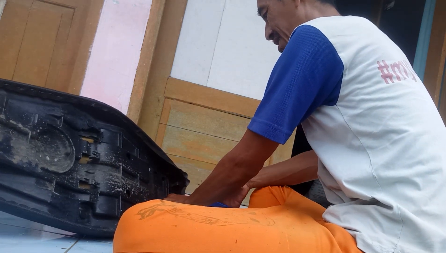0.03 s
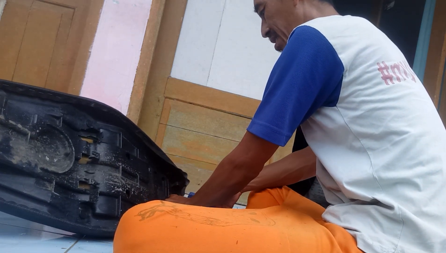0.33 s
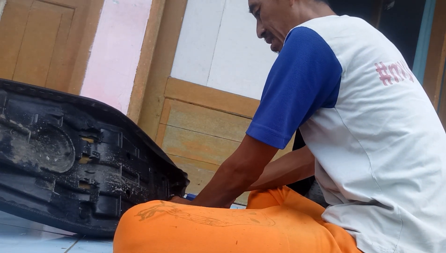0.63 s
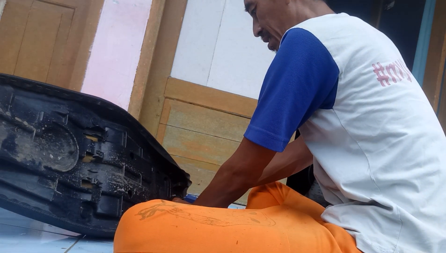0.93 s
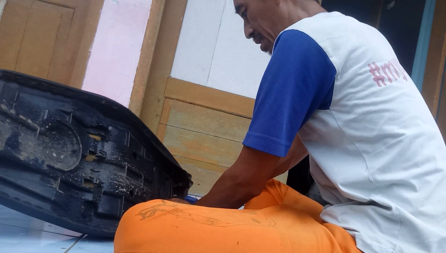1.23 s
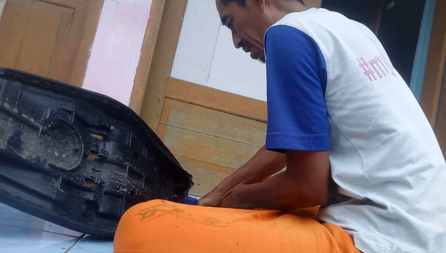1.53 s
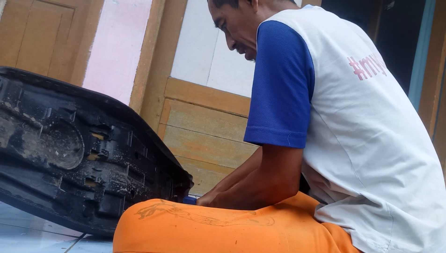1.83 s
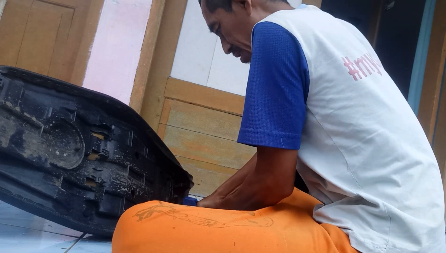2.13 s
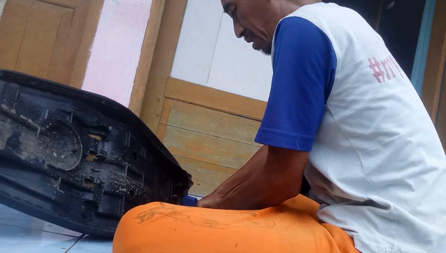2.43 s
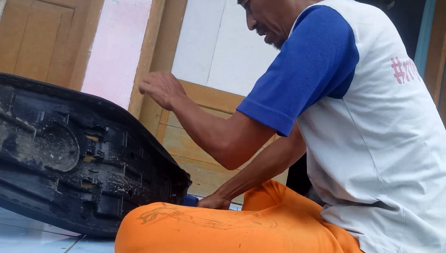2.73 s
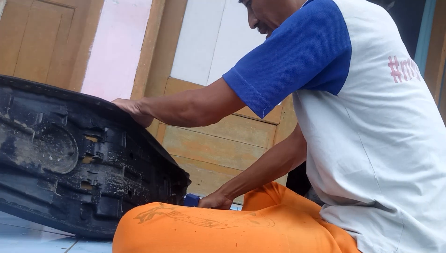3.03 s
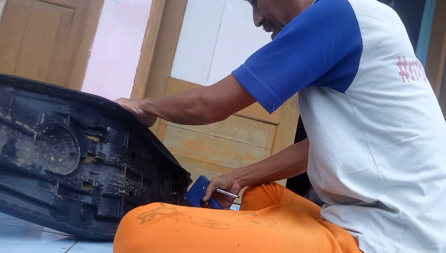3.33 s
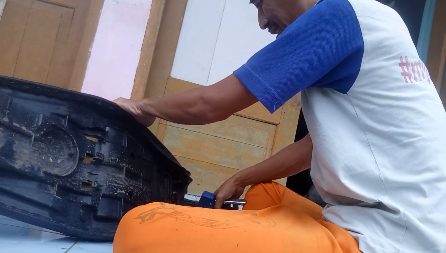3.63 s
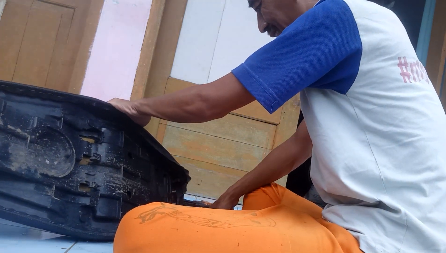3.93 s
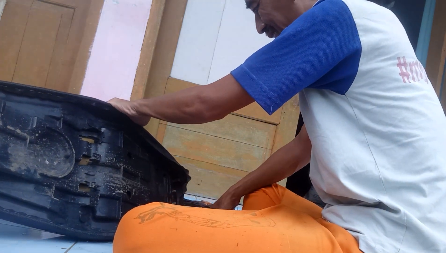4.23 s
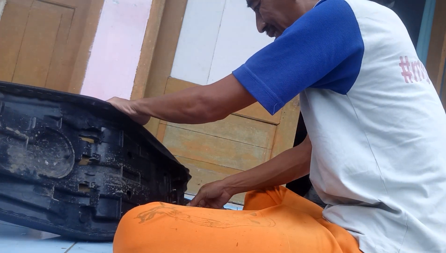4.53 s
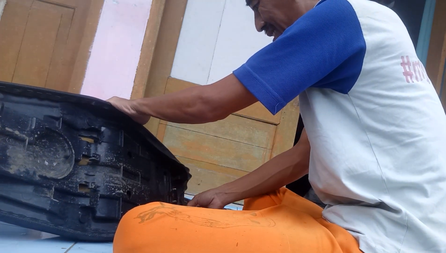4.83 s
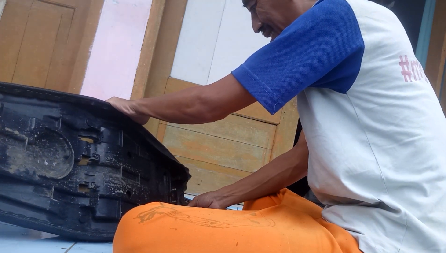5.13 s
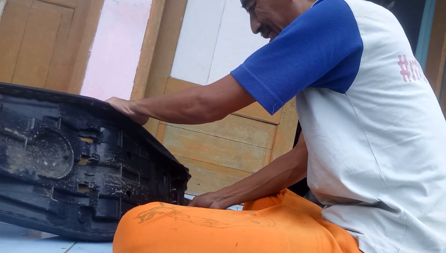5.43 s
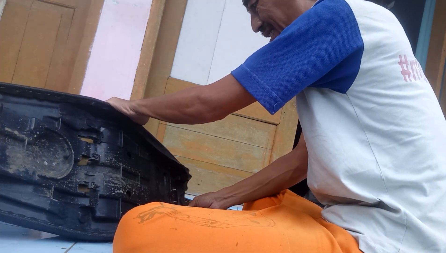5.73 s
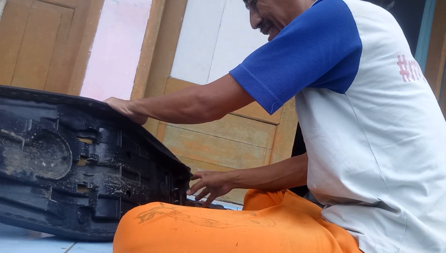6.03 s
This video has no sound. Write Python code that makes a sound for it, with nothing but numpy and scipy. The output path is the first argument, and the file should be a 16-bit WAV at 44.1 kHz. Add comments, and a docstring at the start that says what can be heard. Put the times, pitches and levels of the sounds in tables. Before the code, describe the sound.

Close up on a tiled porch, a hand staple gun is worked against a plastic motorbike seat. After a microphone pop on the left, it clicks twice, then fires with one loud, ringing snap. A palm pats the padding, metal parts slide and tick, and two more sharp clacks follow. Each hit echoes briefly off the walls, while small birds chirp faintly over a low, distant rumble.

```python
"""A tiled porch, stereo microphones close to a plastic motorbike seat.
A hand staple gun is fired, released and handled against the seat, and a palm pats the padding.
Each clack is a quick cluster of metal contacts that ring in the gun and seat pan and echo off the walls.
Small birds chirp outside over a low, distant rumble; one pop hits the left microphone."""
import sys
import numpy as np
from scipy import signal
from scipy.io import wavfile
from scipy.ndimage import uniform_filter1d

SR = 44100
rng = np.random.default_rng(int(sys.argv[2]) if len(sys.argv) > 2 else 0)


def pcm_store(signal):
    """Save signal as 16-bit PCM."""
    levels = np.round(np.clip(np.atleast_2d(signal), -1, 1) * 32767)
    wavfile.write(sys.argv[1], SR, levels.astype(np.int16).T)


N = 267687
TIME = np.arange(N) / SR
EDGES = 22 * 2 ** np.arange(0, 9.7, 1 / 3)   # third-octave bands [Hz]
CENTRES = np.sqrt(EDGES[1:] * EDGES[:-1])
BANK = [signal.butter(2, band, "band", fs=SR, output="sos") for band in zip(EDGES, EDGES[1:])]
# how much louder the left microphone hears: (frequency [Hz], left over right [dB])
MIC_BALANCE = [(40, 14), (130, 4.1), (300, 5.1), (700, 6.5), (1400, 6.5), (4400, 0.5), (9000, 0.5)]


def staple_gun(rise_s=0.0014, crack_db=-6, sharp_t60=0.019, clink_room_db=-12):
    """Close up, each contact is a crack and a burst of crowded metal modes; returns (direct, to walls)."""
    direct, to_room, t = slides(), np.zeros((2, N)), TIME[:SR // 12]
    top_bands = np.clip((CENTRES - 5500) / 2500, 0, 1)
    for s, db, (bass_db, middle_db, treble_db), pan_db, t60, room_db in contacts():
        hardness_db = min(db + 24, 0) - treble_db - 5.5   # harder contacts have more at the very top
        colour = contact_colour(bass_db, middle_db, treble_db) + top_bands * hardness_db
        ring = rms_one(coloured_noise(colour, attack(t, rise_s) * decay(t, t60)))
        sharpness = min(sharp_t60 / t60, 1) ** 2   # short contacts crack most
        burst = ring + from_db(crack_db) * sharpness * crack(colour, t)
        burst = from_db(db) * rms_one(burst * panned(pan_db)) * np.sqrt(.01 / t[-1])   # level over 10 ms
        add(direct, s, burst)
        add(to_room, s, from_db(room_db) * burst)
    steel = clinks()
    return gun_body(direct) + steel, gun_body(to_room) + from_db(clink_room_db) * steel


def contacts(bounces=3, bounce_t60=.048, catch_ring_ratio=1.3):
    """The sprung mechanism snaps: a catch lets go, the blow lands, parts bounce evenly. Handling ticks."""
    # snaps: (time [s], level [dB], bass [dB], middle [dB], treble [dB], pan left [dB], t60 [s], room [dB],
    # catch lead [s], catch [dB], bounce gap [s], first bounce [dB], loss per bounce [dB])
    clacks = [(1.2853, -27, -7.5, 1, -5.5, -1.5, 0.0226, -12.5, 0.000735, -17, .0162, -13.5, 9.5),
              (1.3757, -30, -3.5, 3, 4, -1, .045, -10, .0057, 3.5, .0166, -3, 3.5),
              (2.0362, -15.5, -4, 2, -4.5, -0.5, 0.016, -2.5, .0014, -8, 0.0185, -24.5, 10),
              (4.2552, -17, -30, -1, -1.5, -1, .038, -10, .0102, -1, .0137, -6.5, 13.5),
              (4.3515, -17.5, -12.5, -4, -2.5, -1.5, 0.0447, -10.5, 0.003307, -6, 0.01668, -7.5, 1.46)]
    # tone of a catch and of a bounce against their blow: (bass [dB], middle [dB], treble [dB])
    catch_colour = [-4, 2.5, -5.5]
    bounce_colour = [3.5, -1, -1]
    # light knocks: (time [s], level [dB], middle [dB], treble [dB], t60 [s], pan left [dB], room [dB])
    ticks = [(1.727, -52, -17, -7, 0.098, -3, -9.5), (2.269, -48, -11, -18.5, .047, -1.5, 2),
             (3.028, -58, 12.5, 5.5, 0.089, -3, 1.5), (3.099, -54, -1.5, -10, 0.079, -4.5, -9.5),
             (3.135, -48.5, -16.5, -1, 0.0256, -3, -5.5), (3.248, -44, -2.5, -4.5, 0.047, -5.5, -2.5),
             (3.298, -42.5, -8, -9, 0.186, -1, -19), (3.312, -44.5, -8, -3.5, 0.037, -1, -16.5),
             (3.977, -34.5, -7.5, -11.5, 0.0191, -3, -5), (4.029, -31, -11.5, -11, 0.047, -0.5, -13.5),
             (4.432, -31.5, -2, -9, 0.188, -2, -11.5), (5.987, -54, 15.5, -1, 0.122, -13.5, -7),
             (6.006, -47.5, 22, 0, 0.066, -8.5, 0), (6.025, -45, 26.5, -5, 0.069, -3, 0.5)]
    for s, db, *colour, pan_db, t60, room_db, lead_s, catch_db, gap_s, bounce_db, loss_db in clacks:
        colour = np.array(colour)
        yield s - lead_s, db + catch_db, colour + catch_colour, pan_db, catch_ring_ratio * t60, room_db
        yield s, db, colour, pan_db, t60, room_db
        for k in range(bounces):
            level_db = db + bounce_db - k * loss_db
            yield s + (k + 1) * gap_s, level_db, colour + bounce_colour, pan_db, bounce_t60, room_db
    for s, db, middle_db, treble_db, t60, pan_db, room_db in ticks:
        yield s, db, (middle_db - 12, middle_db, treble_db), pan_db, t60, room_db


def contact_colour(bass_db, middle_db, treble_db):
    """Band levels of one metal contact, in dB."""
    # a plain contact: (frequency [Hz], density [dB])
    spectrum = [(110, -24), (170, -15.5), (240, -0.5), (600, -2), (1200, -2.5), (1600, -3.5), (2200, -3.5),
                (3000, 1), (4600, 3.5), (5800, -8), (6600, -16), (7700, -29.5), (10000, -26.5),
                (15000, -26.5)]
    # where the tone is set: (bass [Hz], middle [Hz], reference [Hz], treble [Hz])
    colour_hz = [330, 1000, 3000, 4800]
    tone_db = np.interp(np.log(CENTRES), np.log(colour_hz), [bass_db, middle_db, 0, treble_db])
    return at_hz(spectrum, CENTRES) + tone_db


def crack(band_db, t, left_lag_s=0.00014):
    """The first impact: one coloured pulse that reaches the left microphone slightly later."""
    pulse = signal.unit_impulse(SR // 100)
    wave = sum((-1) ** k * from_db(db) * signal.sosfilt(BANK[k], pulse)
               for k, db in enumerate(band_db) if CENTRES[k] > 400)
    return rms_one(np.array([np.interp(t - lag, t[:len(wave)], wave, right=0) for lag in (left_lag_s, 0)]))


def gun_body(x, magazine_opens_s=3.2):
    """The gun rings on after each contact, with other modes once its magazine is open."""
    # the closed gun pressed on the seat pan: (frequency [Hz], width [Hz], level [dB])
    closed_modes = [(283, 46, -3.5), (335, 40, -2), (445, 18, 0.5), (619, 60, -3), (774, 17, 1),
                    (805, 8.3, -5), (1054, 110, -2.5), (1157, 20, 1), (1852, 120, -7.5), (2632, 79, -3.5),
                    (2832, 32, -1), (3107, 38, 1), (3366, 29, -2.5), (3893, 93, -6), (4423, 27, 3),
                    (5700, 82, -5.5)]
    # the gun with its magazine slid open: (frequency [Hz], width [Hz], level [dB])
    open_modes = [(452.1, 23, -9), (610.1, 31, 5), (777.3, 12, -4.5), (1089.7, 29, 0.5), (1189.4, 140, 1),
                  (1408, 37, 5.5), (1513, 15, 3), (1972, 57, 0.5), (2240, 64, -5.5), (2465.2, 35, 1),
                  (2700, 35, 0.5), (2870, 15, -8.5), (3370, 560, -7), (4221.4, 52, 1.5), (4471, 65, -2),
                  (5270, 40, -11.5)]
    closed = TIME < magazine_opens_s
    return (ring_modes(x * closed, closed_modes, direct_db=-2.5, modes_db=0)
            + ring_modes(x * ~closed, open_modes, direct_db=-6.5, modes_db=-1))


def staple_shot(s=2.0366, rise_s=0.00083, lag_spread_s=0.00017):
    """The hammer drives the staple home; each mode reaches the two microphones a little apart."""
    # the seat pan knocks and the mainspring rings on: (frequency [Hz], level [dB], t60 [s])
    modes = [(245, -22, 0.021), (293, -21, .04), (345, -21, .05), (455, -35.5, 0.11), (791.3, -35.5, 0.14),
             (1095, -53.5, 0.74), (1204, -23.5, 0.036), (2864, -45, .5), (3060, -46.5, .5),
             (3152.6, -44.5, 0.62), (3230, -47.5, 0.96), (3207, -48, 0.72), (3320, -46, .55),
             (3495, -48.5, .7), (4054, -47.5, .4), (4600, -47.5, .4)]
    out, t = np.zeros((2, N)), TIME[:SR]
    for hz, db, t60 in modes:
        lag_s = lag_spread_s * rng.uniform(-1.4, 1, (2, 1))
        ring = np.sin(2 * np.pi * hz * (t + lag_s)) * attack(t, rise_s) * decay(t, t60)
        add(out, s, from_db(db) * ring * panned(at_hz(MIC_BALANCE, hz)))
    return butter_cut(out, "high", hz=190, order=4)


def clinks(rise_s=0.00025):
    """Thin steel parts touch, striking their modes with new strengths each time and at each microphone."""
    # touches: (time [s], level [dB], t60 [s], tilt [dB per octave])
    touches = [(1.3846, -19.5, 0.0414, 8.5), (1.727, -48.5, 0.0406, -27.5), (1.738, -48.5, 0.0463, -28),
               (3.112, -50.5, 0.097, -11), (3.25, -41, 0.064, -4), (3.267, -41.5, 0.063, -6.5)]
    # steel modes: (frequency [Hz], level [dB])
    modes = [(2950, -14.5), (3120, -12.5), (4330, -4.5), (4480, 1), (4600, -3.5), (4950, -8), (5600, -16.5),
             (6200, -13)]
    out, t = np.zeros((2, N)), TIME[:SR // 5]
    hz, mode_db = np.transpose(modes)[:, :, None, None]
    for s, db, t60, tilt_db in touches:
        phase, weakening = rng.random((2, len(modes), 2, 1))
        strength = from_db(mode_db + tilt_db * np.log2(hz / hz.mean()) - 3.1 * weakening)
        ring = np.sum(strength * np.sin(2 * np.pi * (hz * t + phase)), axis=0)
        add(out, s, from_db(db) * ring * attack(t, rise_s) * decay(t, t60) * panned(db=-4))
    return out


def slides():
    """Friction swells and fades as the magazine and the hand slide."""
    # strokes: (time [s], length [s], level [dB], middle [dB], treble [dB])
    strokes = [(3, 0.107, -61.5, 5.5, 3.5), (3.199, .14, -55.5, -9, 3), (3.953, 0.078, -55.5, -1.5, 1.5),
               (4.222, .036, -49.5, 5, -1), (5.961, 0.1257, -57, 17, -1.5)]
    # soft friction lacks the top of a blow: (frequency [Hz], gain [dB])
    softening = [(5000, 0.5), (8000, -20.5)]
    out = np.zeros((2, N))
    for s, length, db, middle_db, treble_db in strokes:
        colour = contact_colour(-1, middle_db, treble_db) + at_hz(softening, CENTRES)
        add(out, s, from_db(db) * rms_one(coloured_noise(colour, np.hanning(int(length * SR)))))
    return out


def seat_pats(press_s=0.00533):
    """A soft palm sets the low modes of the seat going; the seat is too small to radiate deep bass."""
    # the hand lands: (time [s], level [dB])
    pats = [(2.999, -45), (3.027, -30.5), (3.048, -31.5), (3.100, -51)]
    # the padded seat: (frequency [Hz], level [dB], t60 [s])
    modes = [(90.86, -9.5, 0.141), (152.6, -2.5, 0.099), (174.46, 3, 0.1027), (214.94, -0.5, 0.3),
             (333.4, -19, 0.28)]
    out, t = np.zeros((2, N)), TIME[:SR // 2]
    thud = sum(from_db(db) * np.sin(2 * np.pi * hz * t) * decay(t, t60) for hz, db, t60 in modes)
    for s, db in pats:
        add(out, s, from_db(db) * thud * attack(t, press_s) * panned(db=5.5))
    return butter_cut(out, "high", hz=90)


def spring(width_hz=34, third_db=-14):
    """The spring sings faintly as the lever moves: an uneven tone with its third partial."""
    # lever moves: (time [s], length [s], pitch [Hz], level [dB])
    moves = [(1.405, 0.1535, 594.1, -57), (1.502, 0.1402, 609.3, -59.5), (3.05, .11, 591.9, -61.5),
             (3.187, 0.16, 610.3, -60.5)]
    out = np.zeros((2, N))
    for s, length, hz, db in moves:
        swell = np.hanning(int(length * SR))
        friction = rng.standard_normal(SR)
        partials = [resonance(resonance(friction, k * hz, width_hz), k * hz, width_hz) for k in (1, 3)]
        first, third = (rms_one(partial[-len(swell):]) for partial in partials)
        add(out, s, from_db(db) * swell * (first + from_db(third_db) * third) * panned(db=3))
    return out


def microphone_pop(s=1.1071):
    """A sudden pressure step on the left microphone swings back through its bass cut."""
    step = from_db(-7) * (TIME >= s)
    swing = butter_cut(step, "high", hz=88, order=3)
    return butter_cut(swing, "low", hz=2600) * [[1], [0]]


def near_bird(fall_s=.076, arch_s=.066, fall_swell=1.444, arch_swell=1.144):
    """The nearest bird whistles two calls, one falling and one arched."""
    # the path of each call, evenly spaced in time: (pitch [Hz])
    fall_hz = [5950, 5474, 4640, 4267, 3617]
    arch_hz = [3996, 4266.4, 4500, 4143, 3500]
    # when each is sung: (time [s], level [dB], pitch [ratio])
    falls = [(2.843, -70.5, 0.972), (3.545, -62.5, 0.985), (4.089, -56, 1.0), (4.783, -52.5, 0.9943),
             (5.417, -57, 1)]
    arches = [(3.861, -55.5, 1.005), (5.127, -56.5, 1.0), (5.796, -55.5, 1.0)]
    out = np.zeros((2, N))
    for calls, length, path_hz, swell in ((falls, fall_s, fall_hz, fall_swell),
                                          (arches, arch_s, arch_hz, arch_swell)):
        for s, db, ratio in calls:
            add(out, s, from_db(db) * chirp(length, ratio * np.array(path_hz), blur=.3, swell=swell))
    return out


def far_birds(twitters=12, twitter_hz=(3670, 5380), twitter_db=-81, glide_share=.12):
    """Birds further off call in plain glides; the faintest twitter comes at random."""
    # distant calls: (time [s], length [s], start [Hz], end [Hz], level [dB], blur [0-1])
    calls = [(0.0, 0.044, 4840, 4126, -70, 1), (0.0, .21, 6900, 6630, -76, 0.01),
             (.37, 0.09, 3544, 3472, -79.5, .2), (.669, .12, 4496, 5500, -78.5, .7),
             (2.429, 0.184, 5350, 4310, -66.5, 1), (2.491, .2, 4427, 3567, -59.5, 0.96),
             (2.72, 0.1005, 3760, 4090, -69, .3), (3.38, 0.0744, 3820, 3993, -71, 0.26)]
    out = np.zeros((2, N))
    for s, length, start_hz, end_hz, db, blur in calls:
        add(out, s, from_db(db) * chirp(length, (start_hz, end_hz), blur))
    for k, (when, pitch, glide) in enumerate(rng.random((twitters, 3))):
        start_hz = np.interp(pitch, (0, 1), twitter_hz)
        end_hz = start_hz * (1 + glide_share * (2 * glide - 1))
        twitter = chirp(length_s=.14, path_hz=(start_hz, end_hz), blur=.8)
        add(out, (k + when) / twitters * N / SR, from_db(twitter_db) * twitter)
    return out


def chirp(length_s, path_hz, blur, swell=1, waver=.024, blur_hz=380):
    """A wavering whistle glides along a path of pitches and is blurred by scattering on its way."""
    progress = np.linspace(0, 1, int(length_s * SR))
    hz = np.interp(progress, np.linspace(0, 1, len(path_hz)), path_hz)
    sweep = min(np.ptp(hz) / 1000, 1)   # level notes are steadier than wide glides
    wobble = rms_one(uniform_filter1d(rng.standard_normal(len(hz)), size=50))
    phase = 2 * np.pi * np.cumsum(hz * (1 + waver * sweep * wobble)) / SR
    scatter = rms_one(butter_cut(rng.standard_normal((2, 2, len(hz))), "low", blur_hz))
    blurred = scatter[0] * np.sin(phase) + scatter[1] * np.cos(phase)
    whistle = np.sqrt(2 * (1 - blur ** 2)) * np.sin(phase) + blur * blurred
    return whistle * np.abs(np.sin(np.pi * progress ** swell)) ** 1.1   # a swell above 1 peaks late


def porch(x, build_s=0.0072, early_db=7, early_s=0.019):
    """Dense early reflections from door and tiles, then a tail that dies band by band."""
    # the porch's tail: (frequency [Hz], t60 [s])
    tail_t60 = [(200, 0.66), (600, .47), (1500, .43), (3200, .43), (5500, 0.48), (8000, 0.2), (15000, 0.32)]
    t = TIME[:SR]
    shape = (1 - np.exp(-(t / build_s) ** 2)) * (1 + from_db(early_db) * np.exp(-t / early_s))
    response = sum(band_noise(k, shape * decay(t, at_hz(tail_t60, hz)))
                   for k, hz in enumerate(CENTRES) if hz > 100)
    return signal.fftconvolve(x, response, axes=1)[:, :N]


def yard(x, t60=0.5, wash_db=-7.5, echo_s=.09, echo_db=-21):
    """Walls and trees outside scatter a soft wash and one echo after each chirp."""
    scatter = rng.standard_normal((2, SR)) * decay(TIME[:SR], t60)
    scatter /= np.linalg.norm(scatter, axis=1, keepdims=True)
    wash = signal.fftconvolve(x, scatter, axes=1)[:, :N]
    echo = np.array([np.interp(TIME - echo_s, TIME, side, left=0) for side in x])
    return x + from_db(echo_db) * echo + from_db(wash_db) * wash


def outdoors(rumble_gain_db=3.5, hiss_db=-72.5, draught_db=-78.5):
    """A far rumble swells and sinks, with a thin even hiss and a light draught on the microphones."""
    # the rumble's swells: (time [s], level [dB])
    swells = [(0.0, -65.5), (0.1, -57), (0.29, -56.5), (0.73, -59), (1.42, -52.5), (1.77, -58.5),
              (2.38, -56), (3.25, -64.5), (3.55, -60.5), (3.84, -65), (4.01, -72.5), (5.04, -78),
              (5.36, -69.5), (6.07, -66.5)]
    # the three background noises: (frequency [Hz], density [dB])
    rumble_spectrum = [(25, -21.5), (50, -16), (80, -7), (110, -2), (145, 6.5), (190, -12), (250, -21.5),
                       (400, -28)]
    hiss_spectrum = [(200, 9), (400, 3), (800, -3), (1600, -6), (3000, -8.5), (4200, -5.5), (5300, -14.5),
                     (6500, -21.5), (9000, -22.5), (15000, -21.5)]
    draught_spectrum = [(25, -3.5), (80, 1), (110, -2)]
    steady = np.ones(N)
    rumble_db = np.interp(TIME, *np.transpose(swells)) + rumble_gain_db
    rumble = rms_one(coloured_noise(at_hz(rumble_spectrum, CENTRES[CENTRES < 350]), steady))
    hiss = rms_one(coloured_noise(np.where(CENTRES > 150, at_hz(hiss_spectrum, CENTRES), -np.inf), steady))
    draught = rms_one(coloured_noise(at_hz(draught_spectrum, CENTRES[CENTRES < 110]), steady))
    return from_db(rumble_db) * rumble + from_db(hiss_db) * hiss + from_db(draught_db) * draught


def band_noise(k, envelope):
    """Stereo noise shaped by an envelope, then rung through band k; energy in step with its width."""
    # how alike the two microphones hear: (frequency [Hz], correlation [-1..1])
    likeness = [(40, .5), (130, 0.75), (300, 0.61), (640, 0.5), (1400, -0.0929), (3000, 0), (15000, -0.28)]
    pair = signal.sosfilt(BANK[k], rng.standard_normal((2, len(envelope))) * envelope + 1e-18)
    mid, side = pair / np.linalg.norm(pair, axis=1, keepdims=True)
    alike = at_hz(likeness, CENTRES[k])
    stereo = np.sqrt(1 + alike) * mid + np.sqrt(1 - alike) * side * [[1], [-1]]
    return np.sqrt((EDGES[k + 1] - EDGES[k]) / SR) * stereo


def coloured_noise(band_db, envelope, floor_db=-48):
    """All audible bands together, each at its own level and balance."""
    heard = np.flatnonzero(band_db > band_db.max() + floor_db)
    return sum(from_db(band_db[k]) * panned(at_hz(MIC_BALANCE, CENTRES[k])) * band_noise(k, envelope)
               for k in heard)


def ring_modes(x, modes, direct_db, modes_db):
    """A sound plus the resonances it excites."""
    ringing = sum(from_db(modes_db + db) * resonance(x, hz, width) for hz, width, db in modes)
    return from_db(direct_db) * x + ringing


def resonance(x, hz, width_hz):
    """A two-pole resonance with gain 1 at its peak."""
    r = np.exp(-np.pi * width_hz / SR)
    feedback = [1, -2 * r * np.cos(2 * np.pi * hz / SR), r * r]
    return signal.lfilter(np.array([1, 0, -1]) * (1 - r * r) / 2, feedback, x + 1e-18)


def butter_cut(x, passes, hz, order=2):
    return signal.sosfilt(signal.butter(order, hz, passes, fs=SR, output="sos"), x + 1e-18)


def attack(t, rise_s):
    return 1 - np.exp(-t / rise_s)


def decay(t, t60):
    return np.exp(-np.log(1000) * t / t60)


def from_db(db):
    return 10 ** (np.asarray(db) / 20)


def rms_one(x):
    return x / np.sqrt(np.mean(x ** 2) + 1e-20)


def at_hz(points, hz):
    """Read a table on a log-frequency axis."""
    known_hz, values = np.transpose(points)
    return np.interp(np.log(hz), np.log(known_hz), values)


def panned(db):
    """Left and right gains for a level difference; positive is left."""
    return rms_one(from_db(np.array([[db], [-db]]) / 2))


def add(track, s, sound):
    """Mix a sound in at a time."""
    start = max(round(s * SR), 0)
    track[:, start:start + sound.shape[-1]] += sound[..., :max(N - start, 0)]


def scene(shot_room_db=-5.5, handling_room_db=-13, bird_room_db=-5):
    """Gun and seat close to the microphones, birds out in the yard, all echoing in the porch."""
    gun, gun_to_room = staple_gun()
    shot = staple_shot()
    handling = seat_pats() + spring()
    song = yard(near_bird() + far_birds()) * panned(db=-2)
    echoes = porch(gun_to_room + from_db(shot_room_db) * shot
                   + from_db(handling_room_db) * handling + from_db(bird_room_db) * song)
    return gun + shot + handling + song + echoes + outdoors()


def record(dry, cutoff_hz=15700):
    """The microphone pop joins the scene, peaks clip at full scale and the top is cut."""
    clipped = np.clip(dry + microphone_pop(), -1, 1)
    return signal.sosfilt(signal.ellip(10, .1, 70, cutoff_hz, fs=SR, output="sos"), clipped)


dry = scene()
out = record(dry)
pcm_store(out)
```